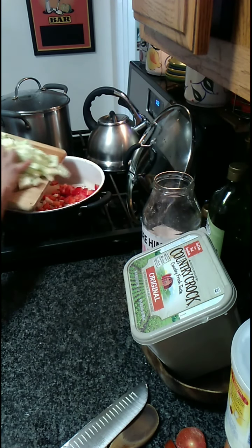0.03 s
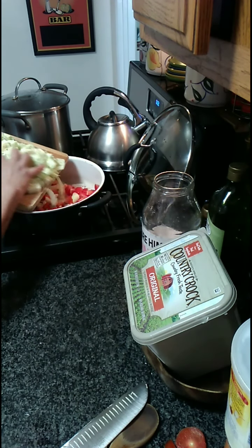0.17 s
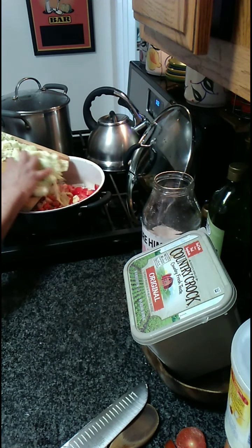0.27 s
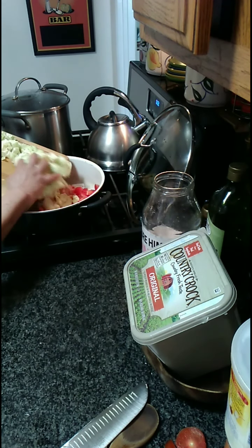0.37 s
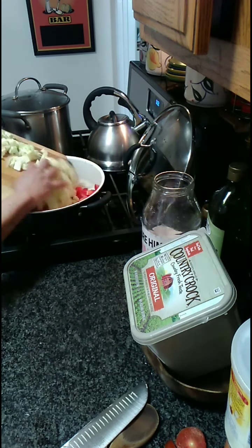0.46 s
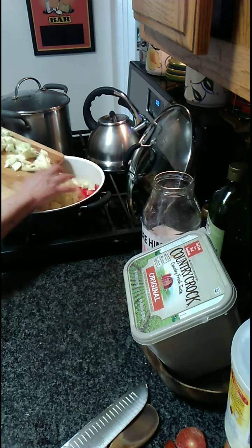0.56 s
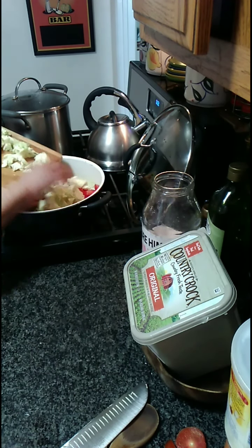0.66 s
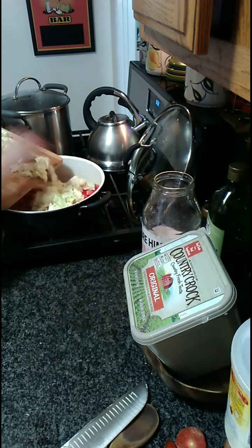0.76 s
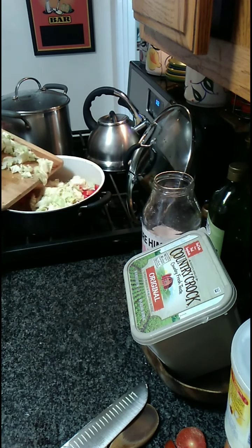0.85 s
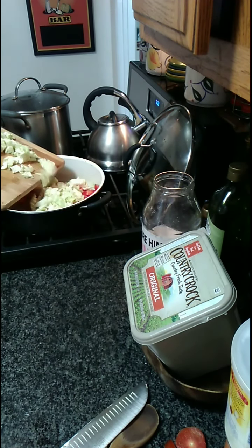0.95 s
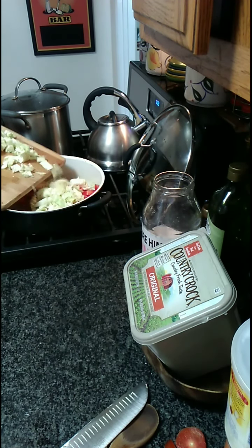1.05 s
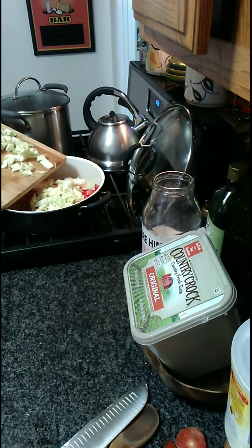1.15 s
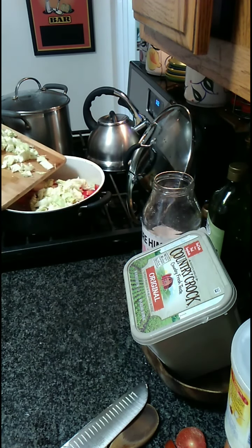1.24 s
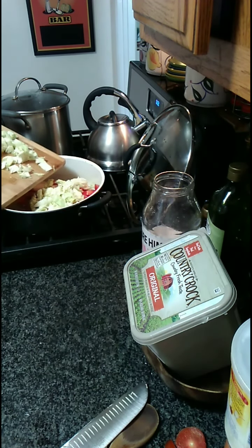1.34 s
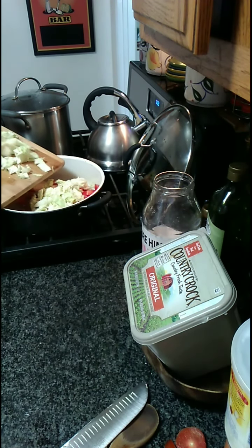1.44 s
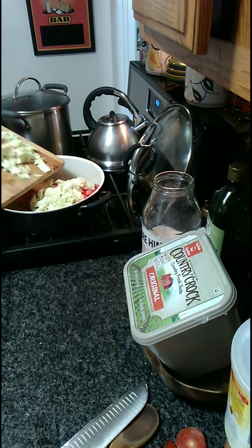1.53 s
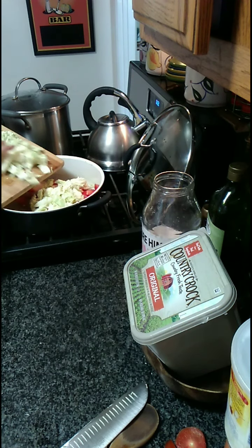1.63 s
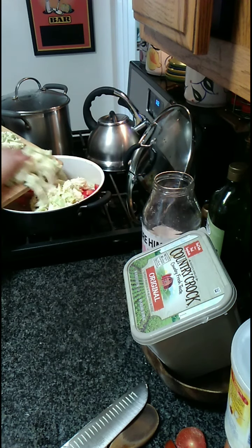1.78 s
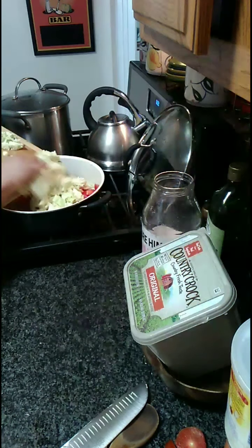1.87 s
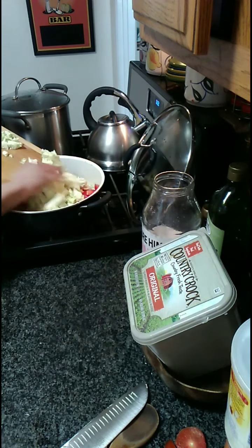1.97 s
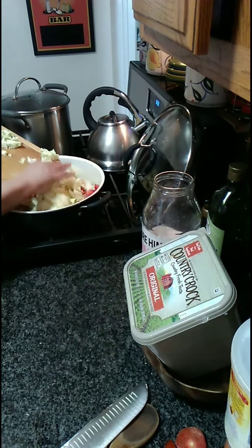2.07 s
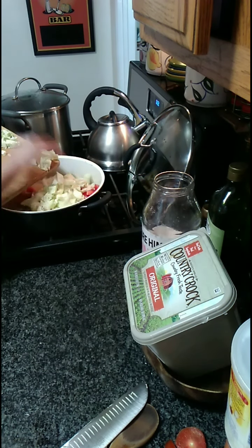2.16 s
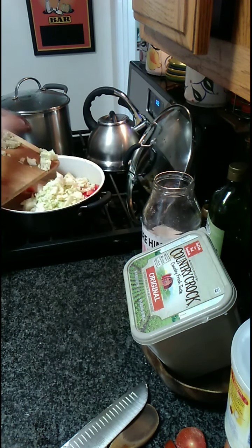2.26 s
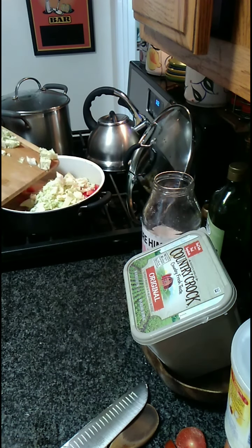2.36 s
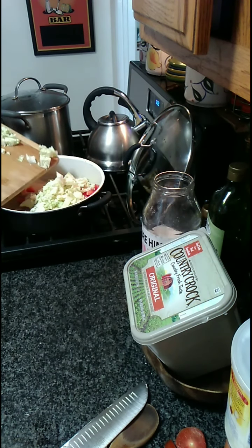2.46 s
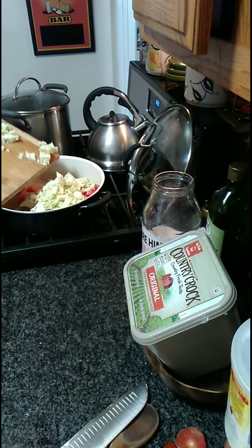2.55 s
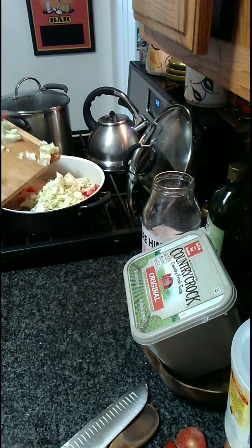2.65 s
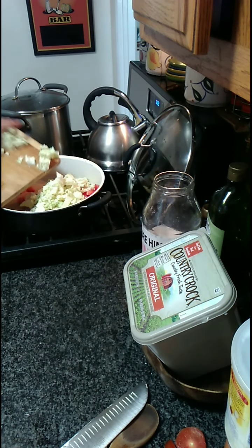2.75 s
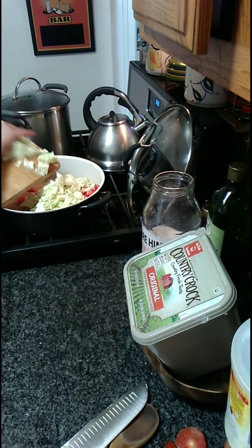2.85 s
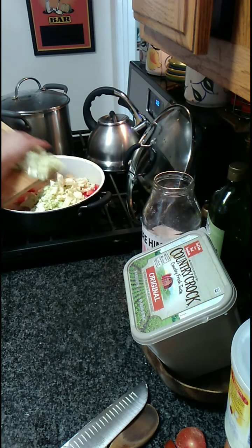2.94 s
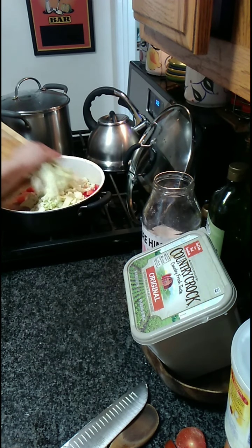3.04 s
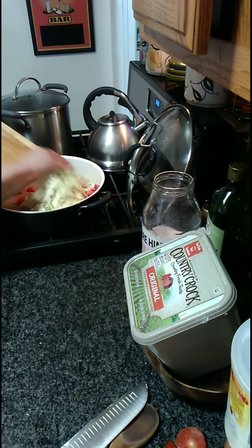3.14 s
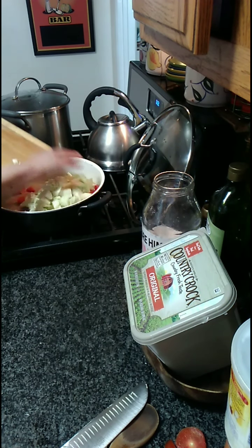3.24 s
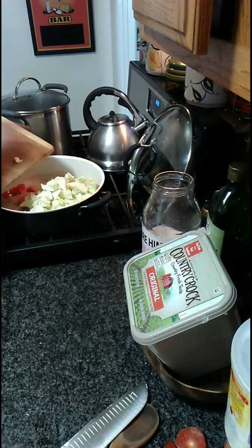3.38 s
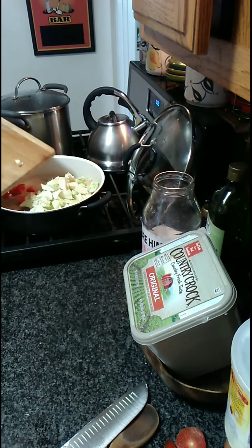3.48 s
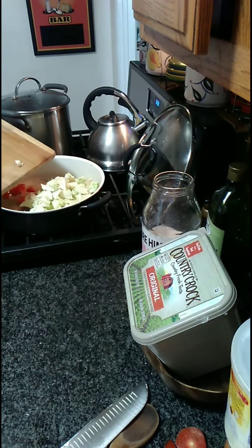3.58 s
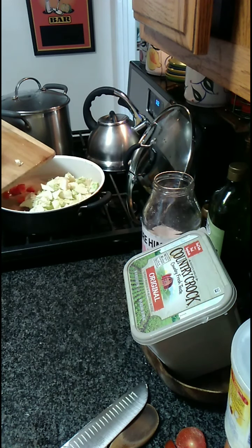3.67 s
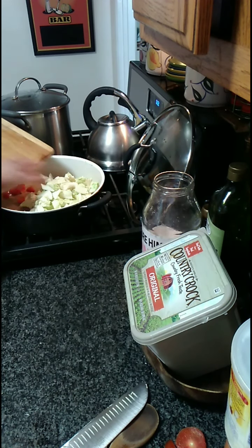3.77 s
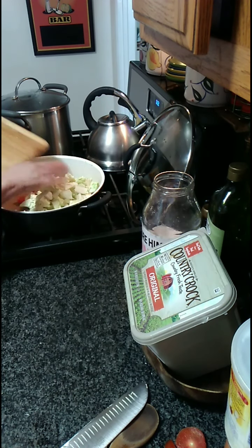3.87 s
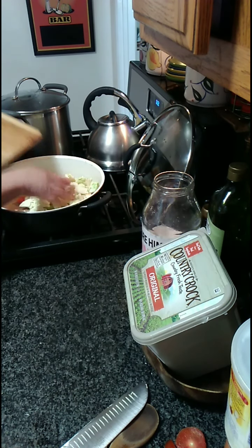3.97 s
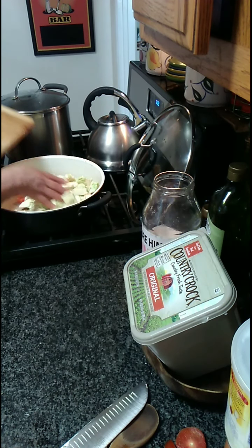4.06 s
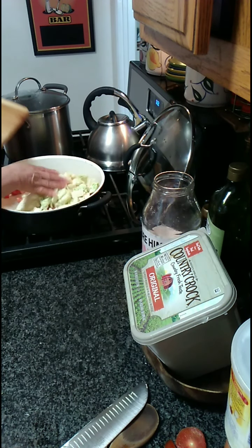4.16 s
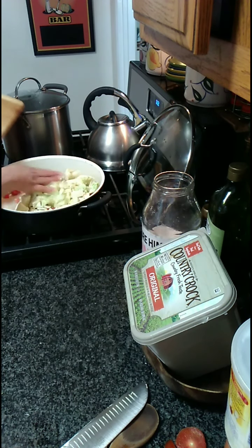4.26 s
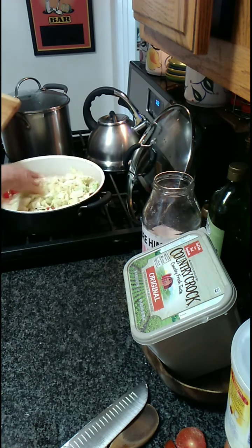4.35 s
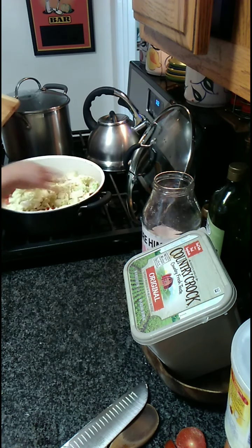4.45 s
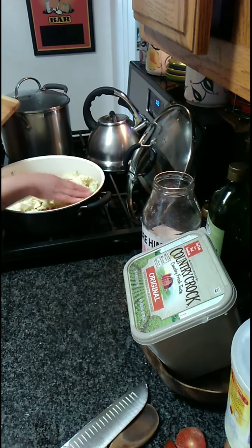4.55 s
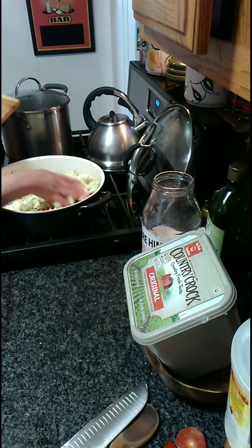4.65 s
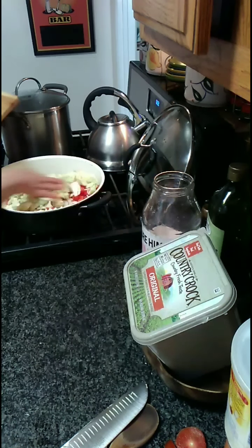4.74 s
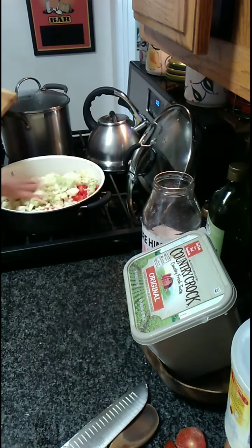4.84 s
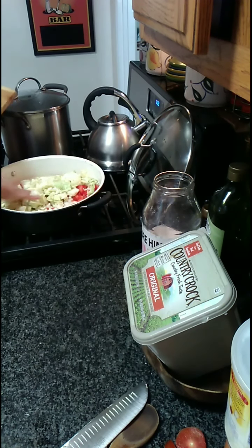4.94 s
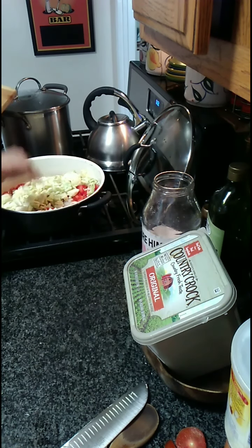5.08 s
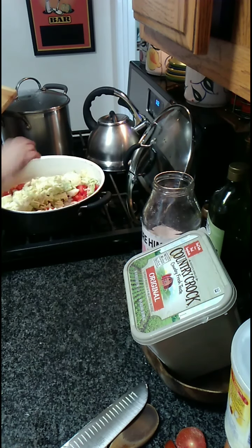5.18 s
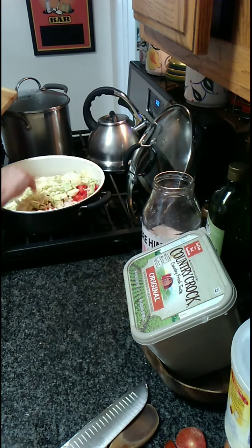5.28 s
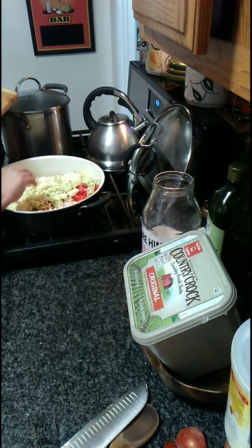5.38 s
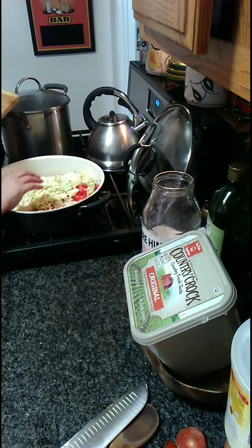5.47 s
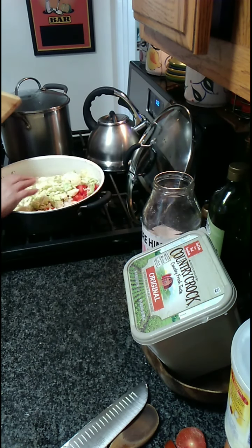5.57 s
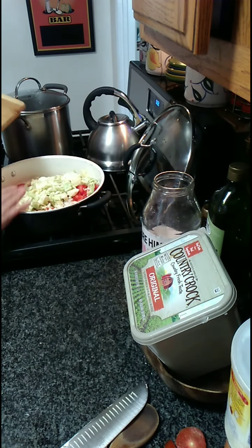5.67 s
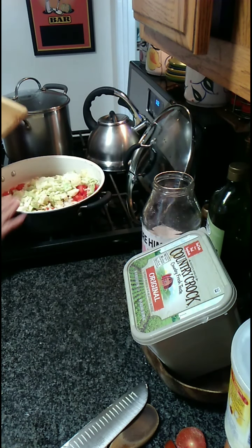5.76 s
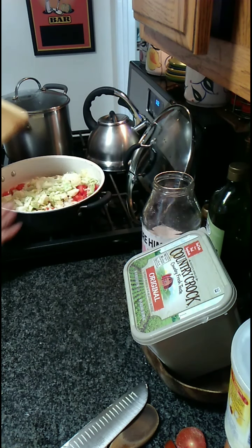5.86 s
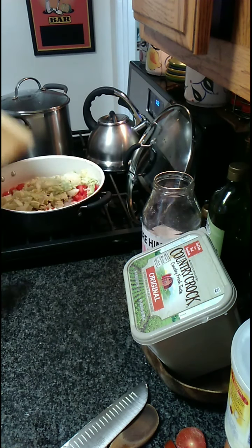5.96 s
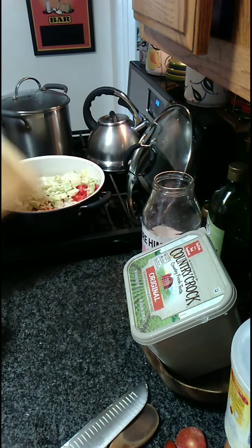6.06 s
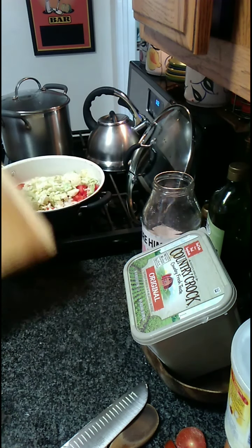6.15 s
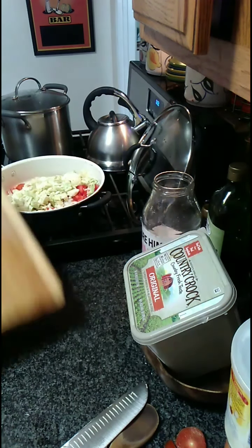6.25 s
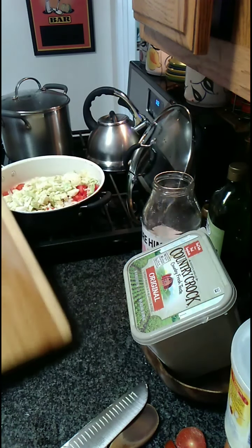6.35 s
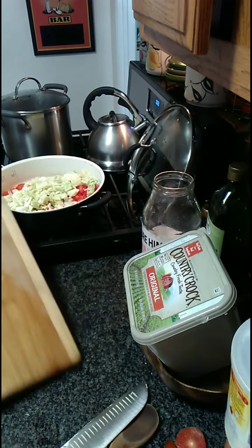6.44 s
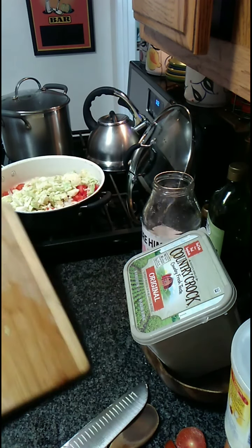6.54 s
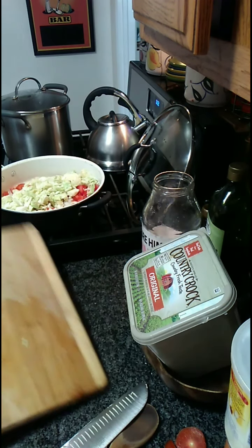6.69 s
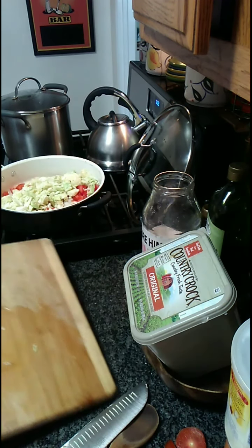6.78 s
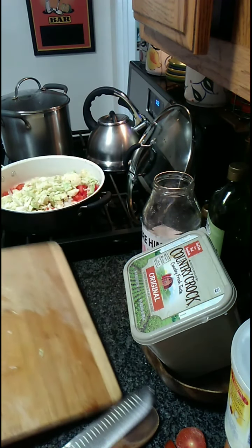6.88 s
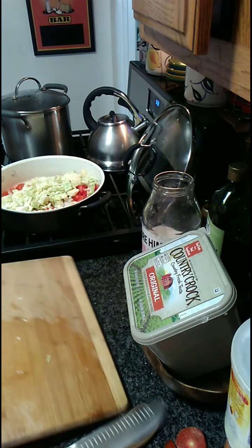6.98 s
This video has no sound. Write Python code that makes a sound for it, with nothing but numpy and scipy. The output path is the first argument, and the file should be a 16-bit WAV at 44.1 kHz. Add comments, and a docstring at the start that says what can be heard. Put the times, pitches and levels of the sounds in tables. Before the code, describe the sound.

Chopped cabbage is swept off a wooden board into a softly sizzling pan, with pan knocks, birdsong, and a final board clap.

```python
"""A small, live kitchen, heard close to the stove through two unlike microphone ports.
Chopped cabbage is swept off a wooden board into a faintly sizzling skillet: noise and clicks shaped by filters.
Clumps plop as short decaying notes, stiff pieces tick, and a hand's rustling jolts the skillet on its grate;
the board is bumped and clapped on the counter. Each knock is a filtered clack plus decaying modes.
A songbird, made of gliding sines, sings falling slurs, rising notes and a thin whistle over a low room tone."""
import sys
import numpy as np
from scipy import signal
from scipy.fft import rfft, irfft, next_fast_len
from scipy.io import wavfile
from scipy.ndimage import uniform_filter1d, minimum_filter1d, map_coordinates

SR = 44100
rng = np.random.default_rng(int(sys.argv[2]) if len(sys.argv) > 2 else 0)


def digitize_waveform(pressure):
    """Quantize a signal to 16-bit integers and store it at the path in sys.argv[1].

    Rows of a 2-D input are taken as channels; values are limited to [-1, 1].
    """
    field = np.atleast_2d(pressure).T
    bounded = np.clip(field, -1, 1)
    quanta = np.round(bounded * 32767).astype(np.int16)
    wavfile.write(sys.argv[1], SR, quanta)


N = 309405
TIME = np.arange(N) / SR  # s

# Event levels are before the layer's gain; spectra and mode levels are relative.

# Soft low bumps while the board is held over the pan: (t/s, length/s, rumble level/dB, drone level/dB)
LOW_BUMPS = [(-.1, 0.19, -55, -49), (0.09, 0.86, -54, -60.5), (.92, 0.32, -49.5, -59),
             (1.176, 0.4, -61, -52.5), (1.65, 0.59, -68, -58.5), (2.45, 0.33, -69, -58.5)]
# Colour of the steady rumble: (f/Hz, level/dB)
RUMBLE_SPECTRUM = [(15, -40.5), (25, -12), (49, -3.5), (65, 9.5), (86, -14), (110, 1.5), (140, -32),
                   (240, -120)]
# Colour of the steady drone: (f/Hz, level/dB per Hz)
DRONE_SPECTRUM = [(60, -30.5), (100, -9.5), (140, 6), (180, -0.5), (240, -15), (400, -24.5), (900, -52)]
# Swells of the sizzling hiss: (t/s, attack/s, hold/s, release/s, level/dB)
SIZZLE_SWELLS = [(-.03, 0.081, .01, 0.15, -48), (.08, 0.23, 0.13, 0.12, -50),
                 (0.48, 0.045, 0.034, 0.28, -57.5), (0.71, 0.18, 0.071, .1, -59),
                 (0.897, 0.23, 0.23, 0.12, -48.5), (1.312, 0.42, 0.085, 0.17, -47),
                 (1.875, 0.023, 0.025, 0.35, -55.5), (2.351, 0.22, 0.34, 0.25, -53),
                 (2.553, 0.37, 0.036, .38, -51), (3.405, 0.099, 0.024, .17, -51),
                 (3.773, 0.16, 0.21, 0.24, -47), (4.278, 0.13, 0.34, 0.16, -47),
                 (4.853, 0.038, .02, .17, -58.5), (5.03, 0.039, 0.019, 0.13, -65),
                 (5.227, 0.1, 0.011, 0.37, -53.5), (5.627, .03, 0.16, 0.17, -59),
                 (5.951, .025, 0.0087, 0.065, -61), (6, 0.044, 0.021, 0.18, -70.5),
                 (6.28, 0.13, 0.015, 0.17, -57), (6.581, 0.02, 0.018, 0.35, -53),
                 (6.774, 0.035, 0.058, 0.26, -50.5)]
# Colour of the sizzle: (f/Hz, level/dB per Hz)
FIZZ_SPECTRUM = [(880, -59), (1500, -14.5), (1790, -2.5), (1930, 0), (2090, -3), (2920, -2.5), (3870, -2),
                 (5950, 0.5), (8290, -7.5), (9510, -5.5), (11400, 5), (14800, -8.5), (15500, -9.5)]

# The bird's falling slurs: (t/s, length/s, top f/Hz, level/dB)
BIRD_SLURS = [(-.04, 0.086, 5350, -37), (0.142, .1, 5210, -41.5), (.326, 0.11, 5170, -41),
              (0.512, .1, 5190, -42), (0.7, 0.11, 5120, -41), (0.887, 0.11, 5095, -42),
              (3.412, 0.21, 4514, -49.5), (3.795, .19, 5366, -44.5), (4.118, 0.14, 5380, -42.5),
              (4.3, 0.086, 5280, -44), (4.484, 0.11, 5290, -42.5), (4.659, 0.11, 5200, -42.5),
              (4.849, 0.11, 5200, -43), (5.025, 0.11, 5150, -41.5), (5.205, 0.18, 5180, -43)]
# The rising note that ends each run: (t/s, level/dB)
RISING_NOTES = [(1.169, -43.5), (5.489, -43)]
# Course of every rising note: (t after its start/s, f/Hz, level/dB)
RISING_COURSE = [(0, 3350, -12), (.04, 3864, -5), (.11, 4173, -11.5), (0.183, 4280, -5.5), (.25, 4150, -13),
                 (.28, 4020, -31)]
# Notes of the long thin whistle: (t/s, length/s, settled f of the second partial/Hz, level/dB)
WHISTLE_NOTES = [(2.297, 0.083, 5970, -70), (2.413, .09, 5900, -50), (2.533, 0.1, 5910, -44.5),
                 (2.693, 0.1, 5850, -45.5), (2.837, 0.11, 5680, -47), (2.993, 0.082, 5606, -41.5),
                 (3.149, 0.093, 5653, -44)]
# The glide that every slur follows, and its loss of level from start to end
SLUR_BOTTOM_HZ, SLUR_HALFWAY_S, SLUR_FADE_DB = 2376, .06, 7
SCOOP_HZ, SCOOP_S = 216, 0.0182  # each whistled note starts this far below its pitch; time constant of the slide

# Hand strokes that push and stir the cabbage:
# (t/s, length/s, board drumming level/dB, hollow rub level/dB, crisp rustle level/dB)
HAND_STROKES = [(0, 0.067, -49, -52, -43), (0.173, 0.18, -47, -59, -53), (0.564, 0.1, -44.5, -51.5, -47),
                (.84, 0.049, -63, -67.5, -85), (1.037, 0.25, -56.5, -59, -56.5),
                (1.353, .04, -51.5, -59.5, -53), (1.427, 0.19, -55.5, -56, -54.5),
                (1.588, 0.13, -58, -52, -54), (1.783, 0.2, -41.5, -48, -43), (2.083, 0.089, -70, -59, -53),
                (2.43, 0.1, -61, -69, -68), (2.512, 0.13, -37.5, -49, -49), (2.649, 0.11, -43.5, -52, -57),
                (2.89, 0.031, -46, -53, -55), (3.034, 0.11, -58, -69, -72),
                (3.446, 0.14, -70, -78.5, -63.5), (3.83, 0.3, -67, -63.5, -65.5),
                (4.035, 0.11, -73, -49.5, -51.5), (4.371, 0.082, -52, -51, -58),
                (4.478, 0.24, -57.5, -60.5, -58.5), (4.751, 0.16, -34.5, -43.5, -39),
                (4.97, 0.035, -39, -43.5, -42), (5.264, 0.12, -44.5, -44, -46),
                (5.634, 0.025, -41, -43.5, -38), (5.707, 0.074, -37.5, -48.5, -45.5),
                (5.831, 0.021, -60, -57, -47), (6.351, 0.17, -92, -62, -50.5)]
STROKE_ATTACK, SETTLE_DB_PER_S = 0.39, 152.5  # share of a stroke spent speeding up; fall as the shreds settle
# The board under sliding shreds: (f/Hz, level/dB per Hz)
DRUM_SPECTRUM = [(150, -40), (260, -10), (330, -4), (430, 0), (520, -2), (640, -12), (900, -45)]
# The pan's hollow answer to the rubbing: (f/Hz, level/dB per Hz)
RUB_SPECTRUM = [(300, -40), (480, -9), (600, -3), (730, -5), (850, -1), (1000, 0), (1250, -1), (1500, -7),
                (2200, -25), (3500, -55)]
# The crisp leaves: (f/Hz, level/dB per Hz)
RUSTLE_SPECTRUM = [(600, -58.5), (1400, 7.5), (2500, 10.5), (5000, -1.5), (8000, -18), (15000, -23)]

# Crisp pieces snapping and ticking on the pan: (t/s, level/dB)
SNAP_EVENTS = [(0.045, -24.5), (0.544, -29.5), (0.6013, -36), (1.256, -29), (1.5824, -67), (1.9655, -30),
               (2.1758, -33.5), (3.8732, -25), (3.964, -34), (4.36, -30), (4.3808, -15), (4.8976, -22),
               (4.972, -27), (5.8666, -39), (5.973, -51)]
# Colour of one snap: (f/Hz, level/dB per Hz)
SNAP_SPECTRUM = [(590, -15), (1000, -14), (2870, -4), (3370, -1), (5400, 6), (7360, -8.5), (11400, -7),
                 (15500, -33)]
# Soft clumps landing in the pan: (t/s, plop level/dB, smack level relative to the plop/dB)
CLUMP_LANDINGS = [(.202, -41.5, -14), (.351, -40, -11), (.427, -41.5, -23), (.587, -42, -27),
                  (.857, -51.5, -26), (1.36, -36, -16.5), (1.442, -38, -5), (1.591, -30.5, -5),
                  (1.658, -33.5, -12.5), (1.762, -38.5, -7.5), (2.101, -42.5, -7), (3.029, -48.5, -10),
                  (3.11, -48, -21), (4.066, -41, -7.5), (4.387, -39, -11.5)]
# Colour of the moist smack: (f/Hz, level/dB per Hz)
SMACK_SPECTRUM = [(400, -35), (900, -9.5), (1300, 6), (1700, 2.5), (2600, -9.5), (5000, -16.5),
                  (12000, -33)]
PLOP_HZ = 600  # middle of the pan's hollow note, which varies a little from clump to clump

# The skillet knocked on its grate: (t/s, level/dB, thud/dB, crack/dB, f of the favoured ring/Hz)
PAN_CONTACTS = [(1.809, -25, -29.5, -5, 1070), (1.874, -43, -24, 1.5, 990), (2.596, -38.5, -16.5, -20, 824),
                (4.747, -14.5, -40.5, -4, 1610), (4.753, -10.5, -36.5, -33, 1590),
                (4.763, -33, -41.5, -14, 1490), (4.789, -35, -32.5, 8, 912), (4.799, -24, -12, -6, 950),
                (5.267, -18, -38.5, -4.5, 1640), (5.316, -18.5, -25, -4, 1690),
                (5.349, -19.5, -26.5, -32, 1320), (5.633, -30.5, -38, -1.5, 1000),
                (5.728, -32.5, -22, -6, 958), (5.783, -46.5, -22.5, 1, 961)]
# Ringing modes of the skillet: (f/Hz, level/dB, t60/s)
PAN_RING_MODES = [(442, 9, 0.36), (518, -9, 0.14), (581, 9.5, 0.29), (837, -3, 0.27), (966, 1, 0.24),
                  (1074, -6.5, .25), (1220, -6.5, 0.49), (1268, -8, 0.16), (1506, -11, 0.46),
                  (1635, -7.5, 0.15), (1614, -2, 0.12), (2420, -5, .2), (3720, 2.5, 0.14)]
# Colour of the skillet's clack: (f/Hz, level/dB per Hz)
PAN_CLACK_SPECTRUM = [(35, -41), (60, -29), (183, -11.5), (385, -23), (423, -2), (509, 0.5), (599, 7.5),
                      (738, -17.5), (931, -13.5), (1630, 2), (2050, -4.5), (5080, -4.5), (8280, -18.5),
                      (11700, -17), (15500, -35)]
# Faint thin squeaks: (t/s, length/s, f/Hz, level/dB)
SQUEAK_EVENTS = [(2.74, .12, 1710, -52), (3.44, .16, 1900, -64), (5.95, .1, 1750, -68),
                 (6.12, .07, 1845, -63), (6.41, .1, 2090, -65)]
# The board bumping the counter, then falling flat and rattling:
# (t/s, level/dB, thud/dB, crack/dB, f of the favoured ring/Hz)
BOARD_CONTACTS = [(6.257, -21, -15.5, -41.5, 350), (6.272, -29, -22, -48, 1000),
                  (6.297, -29.5, -10, -37, 349), (6.598, -15.5, -8.5, -17, 970),
                  (6.606, -11, -23, -30, 945), (6.629, -15, -7.5, -19, 1060), (6.788, 2, -21.5, -13, 787),
                  (6.817, -14, -38.5, -12, 750), (6.844, -9, -27, -18, 1076), (6.871, -7.5, -37, -17, 706)]
# Ringing modes of the board: (f/Hz, level/dB, t60/s)
BOARD_RING_MODES = [(342, -1, 0.14), (505, -8, 0.44), (597, -5.5, 0.28), (722, -3.5, 0.18),
                    (814, -9.5, 0.31), (956, 6, 0.15), (1074, 0.5, 0.23), (1090, -31, 1), (1260, -2, 0.2),
                    (1348, -5, 0.41), (1360, -9, 0.26), (2166, 0.5, 0.22), (2283, 3, 0.12),
                    (2420, -15, 0.69), (2990, -14, 0.39)]
# Colour of the board's clap: (f/Hz, level/dB per Hz)
BOARD_CLAP_SPECTRUM = [(35, -43), (60, -21.5), (210, -19.5), (433, -5.5), (497, -5), (559, -9.5),
                       (657, -6.5), (721, -2), (869, -9), (976, -1), (1200, -4.5), (4850, -20), (8090, -37),
                       (12000, -41), (15500, -61)]

# Decay of the kitchen's reverberation: (f/Hz, t60/s)
KITCHEN_DECAY = [(100, 0.71), (500, 0.39), (2000, 0.37), (6000, 0.37), (14000, 0.15)]
# Likeness of left and right in diffuse sound: (f/Hz, correlation from 0 to 1)
STEREO_LIKENESS = [(60, 0.94), (250, 1), (600, 1), (1200, 0), (15000, 0.024)]
# Left microphone port over the right: (f/Hz, level/dB)
PORT_LEVEL_RATIO = [(60, 5), (200, 4), (400, 7.5), (700, 13), (1300, 2.5), (2400, 4.5), (4400, -1.5),
                    (7000, 2), (9000, 15.5), (11000, 33.5), (15000, 43)]
# Lag of the right microphone port: (f/Hz, phase/rad)
PORT_LAG = [(60, 3), (250, 2.5), (450, 4.5), (800, 0)]
TOP_HZ = 15550  # nothing is kept from here up


def amp(db):
    """Decibels to gain."""
    return 10 ** (np.asarray(db) / 20)


def unit(x):
    """Scaled to rms 1."""
    return x / np.sqrt(np.mean(x ** 2) + 1e-20)


def peak_one(x):
    """Scaled so that its loudest few milliseconds have rms 1."""
    power = uniform_filter1d(np.mean(x ** 2, axis=0), size=256)
    return x / np.sqrt(power.max())


def along(points, hz):
    """(f/Hz, value) points read on a log frequency axis."""
    f, value = np.transpose(points)
    return np.interp(np.log(hz + 1), np.log(f + 1), value)


def wobble(rate, n):
    """A smooth random curve, rate knots a second."""
    knots = rng.standard_normal(int(n * rate / SR) + 4)
    return map_coordinates(knots, [np.arange(n) * rate / SR])


def swell(s, attack, hold, release):
    """A gain that rises smoothly from time s, holds and falls smoothly."""
    ramp = np.minimum((TIME - s) / attack, (s + attack + hold + release - TIME) / release)
    return np.sin(np.pi / 2 * np.clip(ramp, 0, 1)) ** 2


def add(track, s, sound):
    """Mix a sound into a track at time s, cutting what falls outside."""
    i = round(s * SR)
    part = sound[..., max(-i, 0):max(N - i, 0)]
    start = max(i, 0)
    track[..., start:start + part.shape[-1]] += part


def filtered(x, response):
    """x times a complex response of frequency."""
    n = x.shape[-1]
    m = 2 * next_fast_len(n // 2 + 4096)  # an even length with padding
    return irfft(rfft(x, m) * response(np.fft.rfftfreq(m, 1 / SR)), m)[..., :n]


def coloured(x, spectrum):
    """x through the causal, minimum-phase filter of a (f/Hz, level/dB) spectrum."""
    def response(hz):
        cepstrum = irfft(np.log(amp(along(spectrum, hz)) + 1e-6))
        half = len(cepstrum) // 2
        cepstrum[1:half] *= 2  # folding the cepstrum forward in time makes the filter causal
        cepstrum[half + 1:] = 0
        return np.exp(rfft(cepstrum))
    return filtered(x, response)


def diffuse(n):
    """Stereo noise, alike in the bass and nearly unrelated in the treble."""
    def mid_side(hz):
        turn = np.arccos(np.clip(along(STEREO_LIKENESS, hz), -1, 1)) / 2
        return np.array([np.cos(turn), np.sin(turn)])
    mid, side = filtered(rng.standard_normal((2, n)), mid_side)
    return np.array([mid + side, mid - side])


def room(direct_db):
    """The way to the microphone: a direct spike, first at the right port, and the kitchen's decaying tail."""
    hz, t, z = signal.stft(diffuse(SR // 2), SR, nperseg=256)
    decay = amp(-60 * t / along(KITCHEN_DECAY, hz)[:, None])
    tail = signal.istft(z * decay, SR, nperseg=256)[1]
    tail /= np.linalg.norm(tail[0])
    tail[[0, 1], [45, 0]] += amp(direct_db)  # the left port hears it 45 samples later
    return tail / np.linalg.norm(tail[0])  # energy 1 at the left port


def in_room(x, direct_db):
    """A mono track as heard in the kitchen; a higher direct level sounds nearer."""
    return signal.fftconvolve(x[None], room(direct_db), axes=1)[:, :N]


def crackle(rate, spread_db):
    """Random tiny clicks, about rate a second, mostly small and a few large."""
    size = amp(spread_db * np.minimum(rng.exponential(size=N), 4))
    present = rng.random(N) < rate / SR
    return unit(present * size * rng.standard_normal(N))


def patchy(x, depth_db):
    """Each part of the spectrum flares and fades on its own."""
    z = signal.stft(x, nperseg=1024)[2]
    field = rng.standard_normal(z.shape[1:])
    field = uniform_filter1d(field, size=3, axis=0)  # smooth over frequency
    field = uniform_filter1d(field, size=6, axis=1)  # smooth over time
    return signal.istft(z * amp(depth_db * unit(field)), nperseg=1024)[1][:, :N]


def tone(hz, waver):
    """The phase of a slightly unsteady pitch."""
    unsteady_hz = hz * (1 + waver * wobble(698, len(hz)))
    return 2 * np.pi * np.cumsum(unsteady_hz) / SR


def room_tone(rumble_db, drone_db, hiss_db):
    """The kitchen's steady rumble, drone and very faint hiss; soft bumps lift the two low layers."""
    low, mid = amp(rumble_db), amp(drone_db)
    for s, length, low_db, mid_db in LOW_BUMPS:
        bump = swell(s, length / 2, 0, length / 2)
        low = np.hypot(low, amp(low_db) * bump)  # powers add
        mid = np.hypot(mid, amp(mid_db) * bump)
    rumble = low * unit(coloured(diffuse(N), RUMBLE_SPECTRUM))
    drone = mid * unit(coloured(diffuse(N), DRONE_SPECTRUM))
    hiss = amp(hiss_db) * unit(coloured(diffuse(N), [(200, 28.0), (1000, 15.5), (15000, -3)]))
    return rumble + drone + hiss


def bird(gain_db):
    """Slurs fall, the long ones levelling out; a rising note ends the run; all by way of the next room's walls."""
    song = np.zeros(N)
    for s, length, top_hz, db in BIRD_SLURS:
        t = np.arange(int(length * SR)) / SR
        hz = SLUR_BOTTOM_HZ + (top_hz - SLUR_BOTTOM_HZ) / (1 + (t / SLUR_HALFWAY_S) ** 2)
        arch = np.sqrt(np.abs(np.sin(np.pi * t / length)))
        fade = amp(db - SLUR_FADE_DB * t / length)
        add(song, s, arch * fade * np.sin(tone(hz, waver=.042)))
    offset, pitch, level = np.transpose(RISING_COURSE)
    t = np.arange(int(offset[-1] * SR)) / SR
    for s, db in RISING_NOTES:
        phase = tone(np.interp(t, offset, pitch), waver=.032)
        add(song, s, amp(db + np.interp(t, offset, level)) * np.sin(phase))
    # Two reverberations in a row: the next room, taken at its right port, then the kitchen, mostly indirect.
    next_room = in_room(amp(gain_db) * song, direct_db=9)[1]
    return in_room(next_room, direct_db=-10)


def sizzle(gain_db, flutter_db):
    """A fine, fluttering hiss with tiny bursting bubbles as clicks; it swells and fades."""
    power = np.zeros(N)
    for s, attack, hold, release, db in SIZZLE_SWELLS:
        power += (amp(db + gain_db) * swell(s, attack, hold, release)) ** 2
    bubbles = unit(in_room(crackle(rate=1000, spread_db=3.5), direct_db=-1))
    flutter = amp(flutter_db * wobble(70, N))
    fizz = (unit(diffuse(N)) + amp(-2) * bubbles) * flutter
    return np.sqrt(power) * unit(coloured(patchy(fizz, depth_db=1.5), FIZZ_SPECTRUM))


def sweeping(drum_db, rub_db, rustle_db):
    """Shreds stick and slip under each stroke, then settle: board drums, pan answers hollowly, leaves rustle."""
    power, t = np.zeros((3, N)), np.arange(SR) / SR
    for s, length, *levels_db in HAND_STROKES:
        speeding_up = np.minimum(t / (STROKE_ATTACK * length), 1)
        settling = amp(-SETTLE_DB_PER_S * np.maximum(t - length, 0))
        add(power, s, np.outer(amp(levels_db), speeding_up * settling) ** 2)
    low, hollow, crisp = np.sqrt(power)

    def slips():
        return patchy(in_room(crackle(rate=600, spread_db=2.5), direct_db=-2), depth_db=4)

    crunch = patchy(in_room(crackle(rate=600, spread_db=4), direct_db=-3), depth_db=2)
    drum = low * amp(drum_db) * unit(coloured(slips(), DRUM_SPECTRUM))
    rub = hollow * amp(rub_db) * unit(coloured(slips(), RUB_SPECTRUM))
    rustle = crisp * amp(rustle_db) * unit(coloured(crunch, RUSTLE_SPECTRUM))
    return drum + rub + rustle


def snaps(gain_db):
    """Single bright ticks of stiff pieces: the room's response to one impulse, coloured."""
    out = np.zeros((2, N))
    for s, db in SNAP_EVENTS:
        tick = peak_one(coloured(room(direct_db=-6), SNAP_SPECTRUM))
        add(out, s, amp(db + gain_db) * tick)
    return out


def clumps(gain_db, smack_db, rise_s, direct_db):
    """A soft landing is a moist smack of noise and a brief burst of the pan's hollow note."""
    out, t = np.zeros((2, N)), np.arange(SR // 16) / SR
    for s, db, smack_level in CLUMP_LANDINGS:
        hz = PLOP_HZ * rng.normal(1, .015)
        swelling = (t / rise_s) ** 2 * np.exp(-(t / rise_s) ** 2)  # strongest at rise_s
        note = np.sin(2 * np.pi * hz * t) * swelling
        plop = peak_one(signal.fftconvolve(note[None], room(direct_db), axes=1))
        smack = peak_one(coloured(room(direct_db=-7.5), SMACK_SPECTRUM))
        add(out, s - .005, amp(db + gain_db) * plop)  # starts ahead of the listed time
        add(out, s - .005, amp(db + smack_level + smack_db) * smack)
    return out


def knocks(rows, modes, spectrum, ring_db, focus_db, direct_db, boom_db, thud_db, crack_db):
    """Each contact is a clack that fills the room plus the body's modes; hard contacts are brighter."""
    out = np.zeros((2, N))
    usual = np.mean(rows, axis=0)
    for s, db, thud, crack, main_hz in rows:
        weight = thud - usual[2]
        brightness = crack - usual[3]
        hardness = [(120, weight + boom_db), (300, weight + thud_db), (600, 0.0078), (1300, 0.0095),
                    (4000, brightness + crack_db)]
        clack = peak_one(coloured(room(direct_db), spectrum))
        t = np.arange(clack.shape[1]) / SR
        ring = np.zeros_like(clack)
        for hz, level, t60 in modes:
            # The point of contact picks out the modes near main_hz.
            favour = focus_db * np.exp(-(np.log(hz / main_hz) / 0.18) ** 2)
            chance = rng.normal(0, 1.2)  # dB
            decay = amp(level + favour + chance - 60 * t / t60)
            ring += decay * np.sin(2 * np.pi * (hz * t + rng.random((2, 1))))
        ring = peak_one(ring * (1 - np.exp(-t / 0.0025)))  # soft onset
        add(out, s, amp(db) * coloured(clack + amp(ring_db) * ring, hardness))
    return out


def pan_knocks():
    """The skillet jolted on its grate: metal modes, strongly chosen by the point of contact."""
    return amp(-7) * knocks(PAN_CONTACTS, PAN_RING_MODES, PAN_CLACK_SPECTRUM, ring_db=-7.5, focus_db=20.5,
                            direct_db=-7.5, boom_db=15.0, thud_db=-5, crack_db=-2.5)


def whistle(gain_db, lower_db):
    """The bird's thin held notes slide up: a strong second partial over a weak, rougher first."""
    out = np.zeros(N)
    for s, length, pitch_hz, db in WHISTLE_NOTES:
        t = np.arange(int(length * SR)) / SR
        hz = pitch_hz - SCOOP_HZ * np.exp(-t / SCOOP_S)
        upper = np.sin(tone(hz, waver=.006))
        lower = np.sin(tone(hz / 2, waver=.02))
        arch = np.sqrt(np.abs(np.sin(np.pi * t / length)))
        add(out, s, amp(db + gain_db) * arch * (upper + amp(lower_db) * lower))
    return in_room(out, direct_db=2)


def squeaks(gain_db):
    """Short wavering sine tones that swell and fade."""
    out = np.zeros(N)
    for s, length, hz, db in SQUEAK_EVENTS:
        n = int(length * SR)
        wavering = np.sin(tone(np.full(n, hz), waver=.04))
        add(out, s, amp(db + gain_db) * np.hanning(n) * wavering)
    return in_room(out, direct_db=3)


def board_knocks():
    """The board bumped and clapped on the counter: wooden modes under a duller clap."""
    return amp(-5.0) * knocks(BOARD_CONTACTS, BOARD_RING_MODES, BOARD_CLAP_SPECTRUM, ring_db=-2, focus_db=14,
                              direct_db=-8, boom_db=5.5, thud_db=0.5, crack_db=-3.5)


def scene():
    """All sources around the stove, with the bird beyond."""
    background = room_tone(rumble_db=-73.5, drone_db=-64.5, hiss_db=-79.5)
    song = bird(gain_db=3.5) + whistle(gain_db=0.5, lower_db=-13.5)
    hiss = sizzle(gain_db=2.5, flutter_db=1)
    cabbage = sweeping(drum_db=-4, rub_db=2.5, rustle_db=-2.5)
    cabbage += snaps(gain_db=-15.0)
    cabbage += clumps(gain_db=-1.5, smack_db=-2.5, rise_s=0.0071, direct_db=-1)
    return background + song + hiss + cabbage + pan_knocks() + squeaks(gain_db=4) + board_knocks()


def limited(x, ceiling, hold):
    """Gain dips around loud peaks, shared by both channels; hold is the width of the dip in seconds."""
    need = np.minimum(1, ceiling / (np.abs(x).max(axis=0) + 1e-9))
    held = minimum_filter1d(need, int(hold * SR))
    return x * uniform_filter1d(held, size=80)


def record(dry):
    """Two microphone ports, the right one dull and out of phase in the bass; then a limiter and the band limit."""
    def ports(hz):
        ratio = amp(along(PORT_LEVEL_RATIO, hz))
        lag = np.exp(-1j * along(PORT_LAG, hz))
        return np.array([ratio, lag]) * 2 / (1 + ratio)  # the two gains add up to 2
    held = limited(filtered(dry, ports), ceiling=.92, hold=.002)
    return filtered(held, lambda hz: hz < TOP_HZ)


dry = scene()
out = record(dry)
digitize_waveform(out)
```